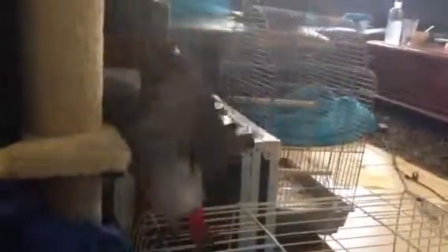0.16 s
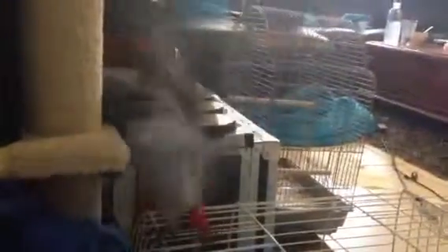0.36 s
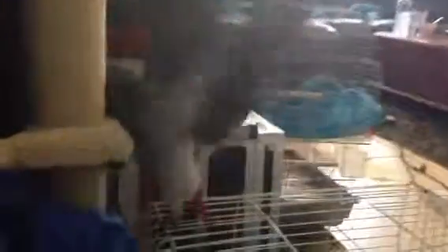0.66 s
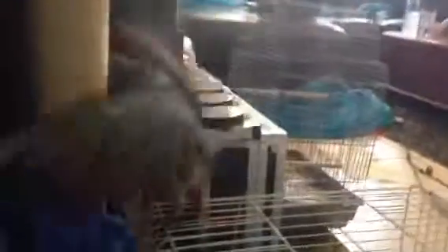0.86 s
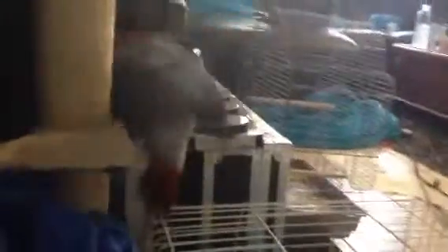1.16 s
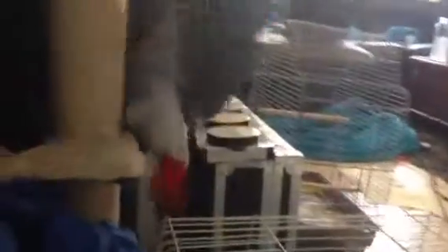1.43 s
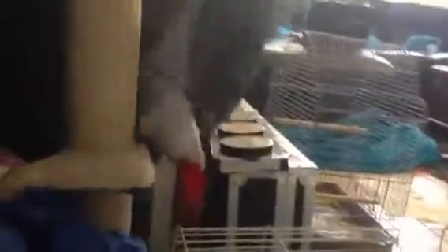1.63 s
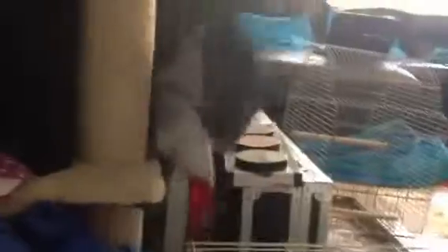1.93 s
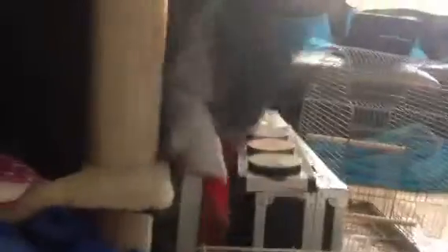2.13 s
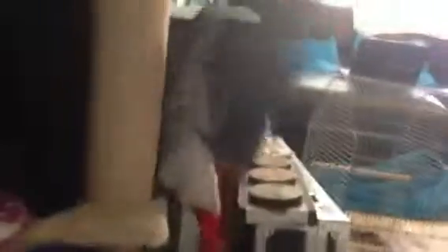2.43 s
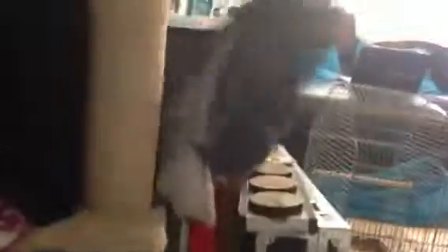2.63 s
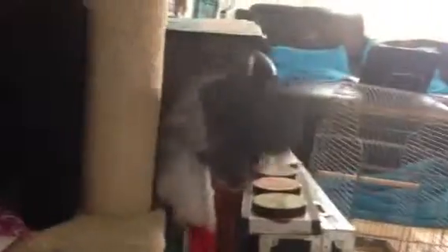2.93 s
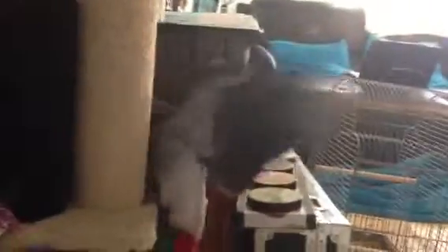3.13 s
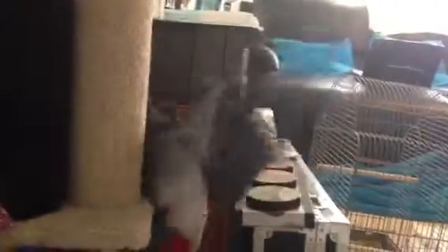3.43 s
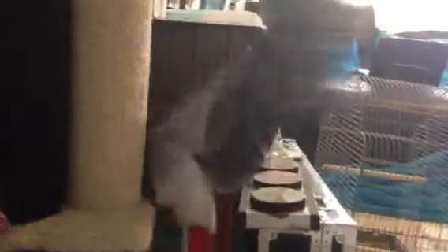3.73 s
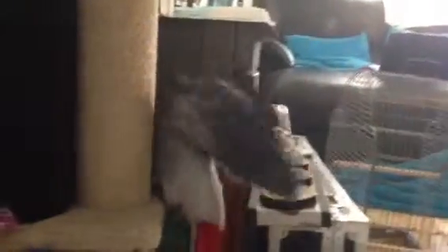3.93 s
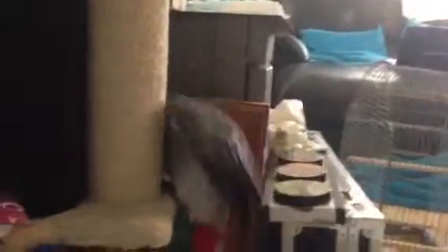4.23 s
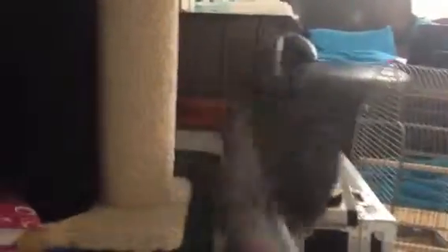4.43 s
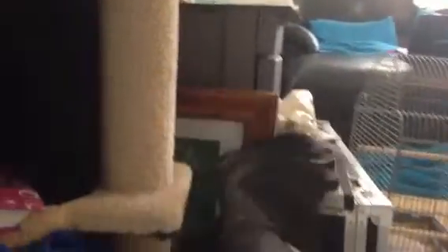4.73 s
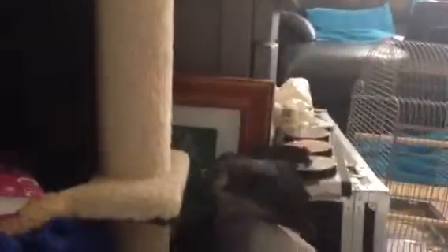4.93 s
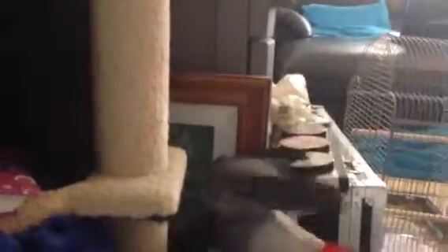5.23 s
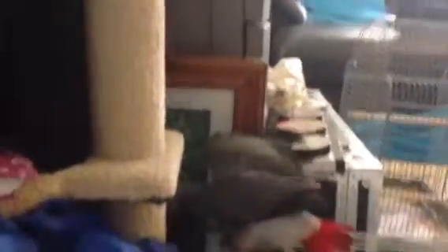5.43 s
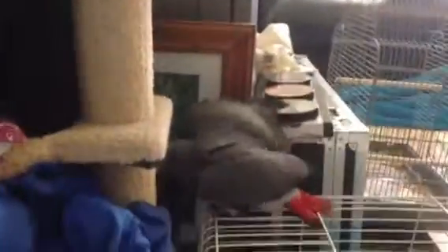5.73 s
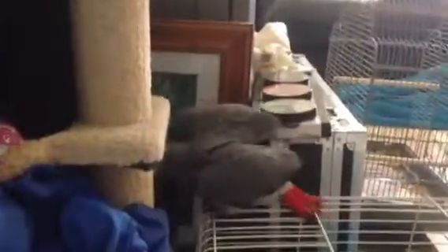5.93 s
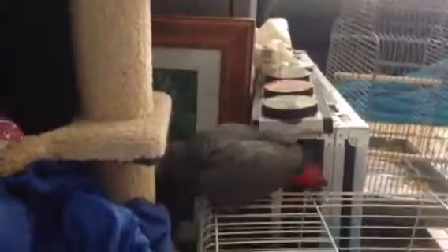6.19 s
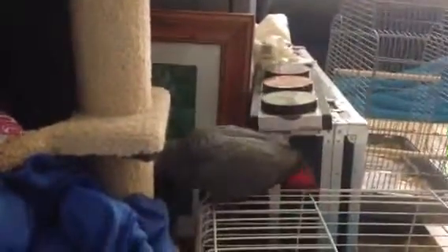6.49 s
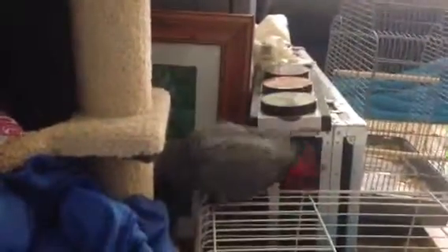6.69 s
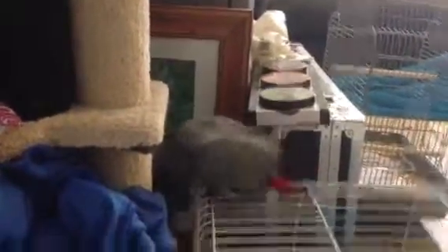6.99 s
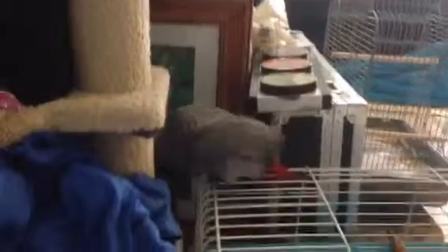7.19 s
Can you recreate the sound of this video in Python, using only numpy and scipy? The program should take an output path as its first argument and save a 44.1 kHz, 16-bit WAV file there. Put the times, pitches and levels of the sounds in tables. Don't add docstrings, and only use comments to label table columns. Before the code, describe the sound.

Close by in a living room, a large parrot flaps rapidly, each stroke a soft, breathy rush of feathers. Wingtips then slap a post with dry quill cracks and dragging feathers. A bigger clatter follows as the bird drops onto its wire cage, the metal clashing and ringing briefly. Afterwards claws scrape and rattle faintly over the wires. Short room echo, low ventilation hum and light hiss, captured by a small thin-sounding microphone.

```python
import sys
import numpy as np
from scipy import signal
from scipy.fft import rfft, irfft, next_fast_len
from scipy.io import wavfile

SR = 44100
rng = np.random.default_rng(int(sys.argv[2]) if len(sys.argv) > 2 else 0)


def elevation(decibels):
    levels = np.asarray(decibels, float)
    return 10 ** (levels / 20)


def output_pcm(signal):
    pcm = np.clip(np.atleast_2d(signal).T, -1, 1) * 32767
    wavfile.write(sys.argv[1], SR, np.round(pcm).astype(np.int16))


N = 324134

# [t/s, peak level/dB, length/s]
BEATS = [(0.0, -39, 0.0093), (0.1, -40.5, 0.048), (0.248, -38, 0.037), (0.312, -45, 0.041),
         (0.401, -38.5, 0.038), (0.564, -39, 0.04), (0.719, -40, 0.056), (0.867, -38.5, 0.039),
         (1.023, -40, 0.041), (1.1673, -40.5, 0.048), (3.536, -46, 0.017), (3.718, -51.5, 0.054),
         (4.34, -48, 0.1), (4.443, -46, 0.028), (5.911, -52.5, 0.076), (6.819, -54.5, 0.029)]
# [t/s, peak level/dB, length/s]
SWEEPS = [(0.921, -41.5, 0.025), (1.111, -42.5, 0.027), (1.2254, -33, 0.018), (1.3194, -43.5, 0.034),
          (1.674, -49.5, 0.047), (1.868, -45.5, 0.049), (2.03, -45.5, 0.074), (2.081, -44, 0.066),
          (2.183, -44.5, 0.092), (2.347, -43.5, 0.039), (2.394, -43, 0.036), (2.497, -44, 0.037),
          (2.66, -45.5, 0.058), (2.831, -49.5, 0.058), (5.087, -48.5, 0.05)]
# [t/s, peak level/dB, length/s]
BRUSHES = [
    (4.414, -21.5, 0.0092),
    (4.683, -36.5, 0.036),
    (6.049, -45, 0.057),
    (7.1746, -54, 0.035),
]
# [t/s, peak level/dB, length/s]
TIPS = [
    (0.811, -43, 0.0072),
    (1.573, -62, 0.03),
    (3.216, -52, 0.039),
    (3.638, -47.5, 0.042),
    (6.2564, -62, 0.013),
]
# [t/s, peak level/dB]
FLICKS = [
    (0.181, -45),
    (0.495, -41.5),
    (0.654, -36.5),
    (0.958, -38),
    (2.216, -48),
    (3.368, -35.5),
    (4.397, -40),
    (6.857, -46.5),
    (6.941, -48.5),
]
# [t/s, peak level/dB, f/Hz]
WHUMPS = [(0.0, -55, 328), (0.1, -47, 422), (0.248, -50, 332), (0.311, -61, 250), (0.403, -53, 427),
          (0.564, -53, 328), (0.72, -49, 370), (0.867, -45, 420), (1.024, -52, 303), (1.168, -55, 334),
          (3.536, -59, 370), (3.719, -55, 370), (4.443, -54, 370)]
# [f/Hz, level/dB]
FEATHER = [(350, -32), (600, -3), (801, 0), (1450, 1.5), (4340, -1.5), (6120, 4), (14100, 6.5),
           (15400, -11), (16000, -33)]
# [t/s, peak level/dB, snap centre f/Hz, feather drag t60/s]
SLAPS = [(1.241, -28.5, 1960, 0.29), (1.396, -25, 3220, 0.48), (1.742, -31.5, 2320, 0.41),
         (1.775, -39.5, 1390, 0.36), (2.548, -27.5, 4230, 0.25), (2.578, -32, 1880, 0.14),
         (2.892, -22, 4300, 0.35), (2.912, -28, 2150, 0.071), (3.276, -22, 2670, 0.21),
         (3.436, -25.5, 1900, 0.15), (3.626, -29, 2200, 0.11), (3.808, -30.5, 5650, 0.22),
         (7.021, -36, 8150, 0.14)]
SLAP_BARBS = [1, -4.5, 3.5, -7, 4, -9, -4.5, 4, -3, 1, 0.5, -0.5, 3]
# [t/s, peak level/dB, snap centre f/Hz, feather drag t60/s, thump level/dB]
BUMPS = [
    (4.425, -18, 1920, 0.22, -21),
    (4.532, -25.5, 7630, 0.54, 1),
    (4.557, -23, 2690, 0.54, -17),
    (4.588, -9.5, 2060, 0.34, -33),
    (4.781, -29, 1220, 0.18, -8),
    (4.962, -41, 4370, 0.5, -5),
    (5.032, -35, 1900, 0.3, -21),
    (5.251, -31, 5460, 0.38, -16),
]
BUMP_BARBS = [-9, -7.5, -7.5, -1.5, -12, -11, -15, -9]
# [t/s, peak level/dB, ring f/Hz, sharp edge against ring level/dB]
QUILLS = [(0.4040, -42, 2400, -2), (0.7223, -42, 2330, -3), (0.8693, -38, 2450, -1), (1.0239, -42, 2400, 0),
          (1.2280, -31, 2700, -4), (1.2385, -23, 2500, -6), (1.2386, -23, 7200, -4),
          (1.2392, -29, 5800, -8), (1.2403, -28, 1900, -9), (1.3977, -20, 3270, -4),
          (1.3993, -20, 6000, -12), (1.4001, -24, 6500, -10), (1.4105, -32, 3600, -4),
          (1.7433, -29, 4480, 0), (1.7459, -34, 2110, -5), (1.7761, -37, 2580, -8), (2.5487, -24, 6000, 0),
          (2.5492, -23, 3960, 0), (2.5566, -31, 4000, -2), (2.8913, -32, 6500, -3), (2.8929, -24, 11500, 2),
          (2.8941, -26, 6290, -2), (3.2738, -34, 2400, -12), (3.2759, -23, 2970, -2),
          (3.2764, -27, 5900, -6), (3.2790, -27, 6200, -6), (3.4364, -29, 2800, -8),
          (3.4386, -22, 2500, -9), (3.6268, -29, 2280, -12), (3.6667, -35, 9000, -4),
          (3.8092, -28, 5990, -3), (4.3980, -35, 1550, -12), (4.3978, -40, 6500, -12),
          (4.4122, -28, 6070, -3), (4.4160, -24, 6700, -5), (4.4195, -24, 2300, -6), (4.4254, -12, 2240, 0),
          (4.4255, -19, 6000, -6), (4.4265, -20, 2280, -8), (4.5580, -21, 2760, -16),
          (4.5832, -32, 2300, -9), (4.5884, -11, 11500, -3), (4.5892, -10, 2070, 0), (4.5905, -9, 4830, -3),
          (4.5955, -15, 6600, -4), (4.6630, -32, 11000, -3), (4.6898, -27, 11400, 0),
          (5.1737, -33, 13480, -30), (5.1772, -47, 14000, -20), (4.7893, -33, 1400, -8),
          (6.0600, -40, 5000, -8), (6.2580, -49, 7970, -6), (6.4092, -45, 1850, -15),
          (6.5108, -53, 2070, -15)]
# [t/s, peak level/dB, centre f/Hz, width/octaves, t60/s]
KNOCKS = [(1.240, -35, 900, 1.2, 0.04), (1.404, -38, 3400, .4, 0.08), (1.408, -39, 2000, .3, 0.03),
          (1.246, -38, 900, .9, 0.04), (1.745, -43, 2000, 0.23, 0.028), (2.55, -39, 1850, 0.24, 0.069),
          (2.552, -41, 310, 0.7, 0.13), (3.628, -40, 2120, 1.1, 0.04), (4.587, -15.5, 2060, 0.4, .022),
          (4.594, -19, 5500, 1.0, .1), (4.61, -26, 1500, .9, .1), (4.905, -47, 1130, 0.51, .03),
          (2.550, -41, 3970, 0.16, 0.18), (2.892, -41, 527, 0.51, 0.029), (3.276, -45.5, 895, 0.63, 0.2),
          (3.439, -36, 2870, 0.38, 0.016), (3.439, -34, 1800, 0.18, 0.038), (3.813, -30, 5200, 0.58, 0.018),
          (3.825, -37.5, 6500, 0.57, 0.0093), (4.427, -26, 2300, 1.5, 0.02),
          (4.558, -30, 2750, 0.35, 0.013), (2.913, -30, 4000, 2.2, 0.02), (4.586, -14, 8000, 1.8, 0.06),
          (5.092, -47, 8000, 0.23, 0.21), (3.473, -38, 6900, 0.55, 0.03), (1.26, -38, 6500, 1.6, 0.09),
          (4.534, -33, 7000, 0.9, 0.03), (5.092, -48, 11000, 0.12, 0.05), (4.962, -48, 4600, 0.6, 0.07),
          (5.033, -44, 6500, 0.6, 0.08), (4.783, -42, 1300, 0.5, 0.08), (4.815, -40, 1500, 1.0, 0.04),
          (4.828, -42, 1100, 0.8, 0.05), (4.783, -43, 4100, 0.12, 0.06), (5.092, -56, 3900, 0.3, 0.05),
          (6.508, -53, 2000, 0.15, 0.09), (5.033, -44, 1900, 0.25, 0.04), (5.092, -52, 15000, 0.1, 0.05),
          (6.38, -63, 6400, 0.1, 0.1)]
# [t/s, peak level/dB, centre f/Hz]
TICKS = [
    (3.667, -36.5, 4320),
    (5.092, -43, 2430),
    (5.654, -53, 5090),
    (6.051, -44, 1650),
]
# [t/s, peak level/dB]
THUDS = [
    (1.397, -39),
    (3.275, -42),
    (3.626, -45),
]
# [t/s, peak level/dB]
BOOMS = [
    (4.429, -36),
    (4.53, -37.5),
    (4.556, -34),
    (4.6, -34),
    (4.82, -41.5),
    (6.799, -52.5),
    (6.986, -48),
]
# [t/s, peak level/dB, rattle length/s, tuning factor]
LANDING = [
    (4.588, -20.5, 0.005, 1.0),
    (4.60, -35, 0.028, 0.98),
    (4.612, -36, 0.02, 1.03),
    (4.782, -52, 0.01, 1.03),
    (5.034, -58, 0.008, 0.88),
]
TOP_GRIPS = [
    (5.254, -41, 0.0053, 0.97),
    (5.30, -57.5, 0.018, 0.83),
    (5.61, -68, 0.017, 0.94),
    (5.68, -67, 0.012, 0.92),
    (5.911, -58, 0.017, 0.95),
]
SIDE_GRIPS = [
    (6.051, -46.5, 0.004, 1.03),
    (6.074, -53, 0.014, 1.01),
    (6.31, -77, 0.025, 1.01),
]
DOOR_GRIPS = [
    (6.366, -44.5, 0.002, 0.99),
    (6.377, -42.5, 0.004, 0.92),
    (6.389, -44, 0.0031, 1.03),
    (6.408, -50, 0.0081, 1),
    (6.432, -48.5, 0.0054, 1.06),
    (6.480, -70, .005, 1.2),
    (6.507, -53.5, 0.0092, 1.07),
    (6.568, -57, 0.0046, 1.33),
    (6.582, -55, .008, 1.1),
    (6.61, -59, 0.014, 1.17),
]
# [f/Hz, level/dB, t60/s]
FRAME = [(1200, -18, 0.11), (1726, -8, 0.14), (1980, -4, .14), (2046, -2.5, .04), (2760, -9.5, 0.077),
         (3900, -10, 0.117), (4040, -10.5, .1), (4910, -11, .06), (4830, -4.5, 0.05), (5640, -9, .1),
         (6240, -10, 0.109), (6630, -9, .1), (7120, -8.5, 0.1), (8820, -9, 0.077), (11550, -6, 0.033)]
TOP = [(1180, -17.5, 0.93), (1650, -12, 0.066), (2350, -8, 0.4), (2554, -1.5, 0.084), (3680, -14.5, .15),
       (4050, -4, 0.12), (4340, -5, 0.068), (5860, -1, 0.074), (5600, 2, 0.05), (7350, -0.5, 0.029),
       (8000, -10, 0.12)]
SIDE_PANEL = [(795, -7, 0.37), (1390, -4.5, 0.08), (1636, -0.5, 0.11), (1800, -4.5, 0.068),
              (2360, -5, 0.17), (2420, -0.5, 0.068), (3930, -12, 0.23), (4300, -10, .12),
              (4850, -4.5, 0.041), (5800, -11, 0.26), (6400, -2, 0.056), (7060, -12, .06), (9100, -10, .07),
              (2980, -8, 0.045)]
DOOR = [(830, -7.5, 0.054), (900, -2, 0.11), (1660, -7, 0.072), (1846, -8.5, 0.076), (2490, -13, 0.063),
        (2780, -20, .05)]
# [t/s, level/dB, length/s, f/Hz]
SCRAPES = [
    (4.113, -63.5, 0.24, 2123),
    (4.781, -50.5, .15, 1303),
    (4.785, -54, 0.08, 2174),
    (5.374, -58.5, 0.12, 2150),
    (5.388, -63.5, 0.097, 4400),
    (6.802, -65, 0.16, 2020),
    (7.101, -66.5, 0.21, 1800),
    (7.256, -67.5, 0.12, 2210),
]
# [t/s, level/dB, length/s, start f/Hz, end f/Hz]
SQUEAKS = [
    (5.3, -66, 0.17, 2500, 2220),
    (5.27, -68, 0.2, 1180, 1150),
    (4.006, -70, 0.097, 2200, 2170),
    (6.42, -66, 0.29, 940, 1169),
    (6.448, -70, .2, 1850, 2110),
    (6.66, -70.5, 0.4, 1850, 1500),
]
# [t/s, level/dB]
EFFORT = [(0.0, -55.5), (1.08, -50.5), (1.35, -50), (1.51, -61.5), (1.84, -58), (2.5, -55.5), (2.8, -59.5),
          (3.01, -71.5), (3.25, -52), (3.52, -51.5), (4.24, -61.5), (4.42, -51), (4.58, -46), (4.83, -61.5),
          (5.04, -56.5), (5.73, -64), (6.12, -61.5), (7.35, -63)]
# [t/s, level/dB, half length/s]
GUSTS = [
    (1.297, -65, 0.3),
    (4.207, -69, 0.21),
    (4.704, -52, 0.44),
    (5.341, -62.5, 0.24),
    (6.203, -66.5, 1),
    (7.33, -57, 0.28),
]
# [f/Hz, t60/s]
ROOM_T60 = [(200, 0.79), (1000, 0.4), (4000, 0.37), (14000, 0.53)]
# [f/Hz, level/dB]
AMBIENT = [(18, -63), (30, -37.5), (75, -22), (149, -1.5), (273, 1), (394, -4), (740, -21), (1190, -12.5),
           (1320, -23), (3400, -18.5), (7270, -20.5), (14400, -23), (16000, -38)]


def unit(x):
    return x / np.sqrt(np.mean(x ** 2) + 1e-20)


def band(x, low_hz, high_hz):
    sos = signal.butter(2, [low_hz, min(high_hz, 0.45 * SR)], "band", fs=SR, output="sos")
    return signal.sosfilt(sos, x)


def at_hz(points, hz):
    table_hz, value = np.transpose(points)
    return np.interp(np.log(hz), np.log(table_hz), value)


def coloured(x, spectrum):
    size = next_fast_len(N)
    hz = np.clip(np.fft.rfftfreq(size, 1 / SR), 10, 14400)
    return unit(irfft(rfft(x, size) * elevation(at_hz(spectrum, hz)), size)[..., :N])


def drift(rate_hz):
    r = np.exp(-32 * np.pi * rate_hz / SR)
    noise = rng.standard_normal(N // 16 + 2002)
    slow = signal.lfilter([1], [1, -2 * r, r * r], noise)[2000:]
    return np.interp(np.arange(N) / 16, np.arange(len(slow)), unit(slow))


def add(track, s, shape):
    i = max(round(s * SR), 0)
    track[..., i:i + shape.shape[-1]] += shape[..., :N - i]


def strokes():
    gains = np.zeros((4, N))
    flicks = [(s, peak_db, 0.0104) for s, peak_db in FLICKS]
    # rows, air push dB, feather brightness dB
    kinds = [(BEATS, -5, 1.1), (SWEEPS, -12, 0.62), (BRUSHES, -8.5, -9.5), (TIPS, -27, 13.1), (flicks, -8.5, -0.66)]
    for rows, push_db, bright_db in kinds:
        for s, peak_db, length in rows:
            t = np.arange(round((abs(length) + 0.12) * SR)) / SR
            swell = np.minimum(t / (0.0012 + 0.11 * length), 1)
            fade = elevation(-60 * np.maximum(t - length, 0) / (0.042 + 0.83 * length))
            flat = np.zeros(len(t))
            mix_db = np.array([push_db + 7.0 - 150 * t, flat, bright_db + flat, 0.97 * bright_db - 0.3 + flat])
            add(gains, s - 0.003, swell * fade * elevation(peak_db - 14.5 + mix_db))
    return gains


def slaps():
    gains, t = np.zeros((4, N)), np.arange(SR // 2) / SR
    slap_thump_db = -12.5
    hits = [(*row, slap_thump_db) for row in SLAPS] + BUMPS
    for (s, peak_db, hz, drag_t60, thump_db), barbs_db in zip(hits, SLAP_BARBS + BUMP_BARBS):
        bright_db = -0.5 + 4 * np.log2(hz / 2500) - 0.31 * (peak_db + 31.5)
        shape = np.minimum(t / 0.0014, 1) * elevation(-60 * t / max(drag_t60, 0.02))
        mix_db = np.array([[thump_db + 2.5], [0], [bright_db], [bright_db + barbs_db]])
        add(gains, s, shape * elevation(peak_db - 20.5 + mix_db))
    return gains


def feather_bands(rough_db):
    grain = rng.standard_normal((4, N)) * elevation(rough_db * drift(122))
    push = band(band(grain[0], 92, 530), 102.5, 820)
    body, edge, barbs = coloured(grain[1:], FEATHER)
    body = band(body, 626, 4800)
    edge = band(edge, 4200, 8460)
    barbs = band(barbs, 8600, 25000)
    return np.array([unit(push), unit(body), elevation(-5.0) * unit(edge), elevation(-1.0) * unit(barbs)])


def wings():
    return ((strokes() + slaps()) * feather_bands(rough_db=0.36)).sum(axis=0)


def quills():
    out, t = np.zeros(N), np.arange(512) / SR
    click = 1.0 * (t == 0)
    for s, peak_db, hz, edge_db in QUILLS:
        top_hz = np.clip(3.6 * hz, 8500, 14000)
        edge = band(band(click, 2800, top_hz), 1000, 1.15 * top_hz)
        fade = elevation(-60 * t * hz / 12)
        ring = np.sin(2 * np.pi * hz * t) * np.minimum(t * hz / 2, 1) * fade
        crack = ring / ring.max() + elevation(edge_db) * edge / edge.max()
        add(out, s, elevation(peak_db) * crack / np.abs(crack).max())
    return out


def snaps():
    out, t = np.zeros(N), np.arange(4096) / SR
    # time, peak dB, centre Hz, width in octaves, t60 s
    rows = [(s, peak_db - 6, hz, 3.1, 0.0075) for s, peak_db, hz, *_ in SLAPS + BUMPS]
    rows += [(*row, 4.6, 0.011) for row in TICKS] + KNOCKS
    rows += [(*row, 270, 2.2, 0.048) for row in THUDS]
    rows += [(*row, 0.7, 0.09) for row in WHUMPS]
    rows += [(*row, 203, 0.78, 0.15) for row in BOOMS]
    for s, peak_db, hz, octaves, t60 in rows:
        low_hz, high_hz = hz * 2 ** (max(octaves, 0.1) * np.array([-0.5, 0.5]))
        attack = np.minimum(t / 0.002, 1) ** 2
        crackle = rng.standard_normal(len(t)) * attack * elevation(-60 * t / max(t60, 0.003))
        burst = band(band(crackle, low_hz, high_hz), 0.66 * low_hz, 5.3 * high_hz)
        add(out, s - 0.001, elevation(peak_db) * burst / np.abs(burst).max())
    return out


def wires(grips, modes, per_s, spread, buzz_db):
    out, t = np.zeros(N), np.arange(SR // 3) / SR
    smooth = signal.butter(2, 150, fs=SR, output="sos")
    for s, peak_db, length, tuning in grips:
        clicks = rng.random(len(t)) < per_s / SR
        rattle = elevation(-9 * t / max(length, 0.002)) * clicks
        for hz, mode_db, t60 in modes:
            ring, r = 0, elevation(-60 / (max(t60, 0.01) * SR))
            *strengths, joint = rng.standard_normal((4, len(t)))
            for side, strength in zip((-1.3, 0, 0.75), strengths):
                w = 2 * np.pi * hz * tuning * (1 + side * spread) / SR
                push = rattle * strength + 1e-18
                wire = signal.lfilter([0, np.sin(w)], [1, -2 * r * np.cos(w), r * r], push)
                ring = ring + elevation(-4 * abs(side)) * wire
            ring = ring * elevation(buzz_db * unit(signal.sosfilt(smooth, joint)))
            add(out, s, elevation(peak_db + mode_db + 2.0) * ring / np.abs(ring).max())
    return out


def cage():
    frame = wires(LANDING, FRAME, per_s=3000.0, spread=0.017, buzz_db=3.0)
    top = wires(TOP_GRIPS, TOP, per_s=5200.0, spread=0.0232, buzz_db=3.5)
    side = wires(SIDE_GRIPS, SIDE_PANEL, per_s=3000.0, spread=0.0138, buzz_db=3.2)
    door = wires(DOOR_GRIPS, DOOR, per_s=1800.0, spread=0.014, buzz_db=1.5)
    return frame + top + side + door


def slides():
    out, grains = np.zeros(N), np.r_[drift(180), np.zeros(SR)]
    scrape_width_hz = 470
    rows = [(s, db, length, hz, hz * (1 - 0.3 * length), scrape_width_hz) for s, db, length, hz in SCRAPES]
    rows += [(*row, 20 + 0.53 * abs(row[4] - row[3])) for row in SQUEAKS]
    for s, level_db, length, start_hz, end_hz, width_hz in rows:
        share = np.arange(round(length * SR)) / (length * SR)
        wobble = unit(band(rng.standard_normal((2, SR // 2)), 8.0, width_hz))[:, -len(share):]
        phase = 2 * np.pi * np.cumsum(start_hz + (end_hz - start_hz) * share) / SR
        grain_db = 4.5 * min(width_hz / scrape_width_hz, 1) * grains[round(s * SR):][:len(share)]
        press = np.minimum(share / 0.16, 1) * (1 - share) ** 0.62 * elevation(grain_db)
        tone = wobble[0] * np.cos(phase) + wobble[1] * np.sin(phase)
        add(out, s, elevation(level_db) * press * tone)
    return out


def rustle():
    t = np.arange(N) / SR
    air, body, edge, barbs = feather_bands(rough_db=0.9)
    effort_db = np.interp(t, *np.transpose(EFFORT))
    stirred = elevation(-67.5 + 0.61 * (effort_db + 57.5))
    for s, level_db, half in GUSTS:
        stirred = stirred + elevation(level_db) * np.clip(1 - abs(t - s) / half, 0, 1)
    plumage = elevation(effort_db - 7.5) * (body + elevation(-1.0) * edge + elevation(-2.5) * barbs)
    return plumage + stirred * elevation(-4.0 + 3.13 * drift(36)) * air


def room(x):
    t = np.arange(SR * 3 // 4) / SR
    white, tail = rng.standard_normal(len(t)), 0
    for low_hz in 110 * 2.0 ** np.arange(8):
        tail = tail + band(white, low_hz, 2 * low_hz) * elevation(-60 * t / at_hz(ROOM_T60, 0.76 * low_hz))
    tail = tail * np.clip((t - 0.004) / 0.00087, 0, 1)
    return elevation(-11) * signal.fftconvolve(x, tail / np.sqrt(np.sum(tail ** 2)))[:N]


def ambient():
    return elevation(-64.5) * coloured(rng.standard_normal(N), AMBIENT)


def scene():
    bird = wings() + quills() + snaps() + cage() + slides()
    return (bird + room(bird) + rustle() + ambient())[None]


def roll_off(x):
    return signal.sosfilt(signal.butter(12, 15830, fs=SR, output="sos"), x)


def record(dry):
    thin = signal.sosfilt(signal.butter(5, 120, "high", fs=SR, output="sos"), dry)
    flicker = band(rng.standard_normal(N), 22, 124) * elevation(2.1 * drift(6.55))
    thin = thin + elevation(-66.5) * flicker
    top_cut = signal.cheby2(14, 40, 15750, fs=SR, output="sos")
    return roll_off(signal.sosfilt(top_cut, thin))


dry = scene()
out = record(dry)
output_pcm(out)
```